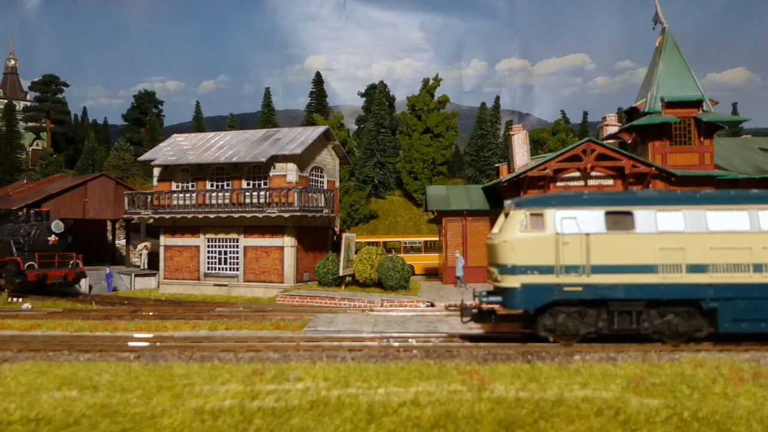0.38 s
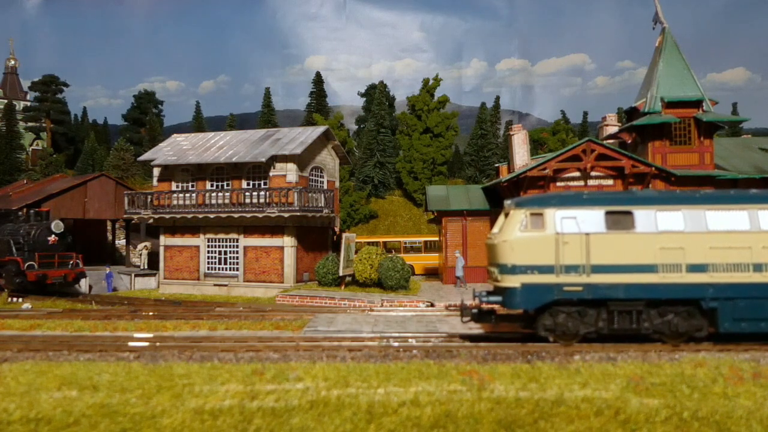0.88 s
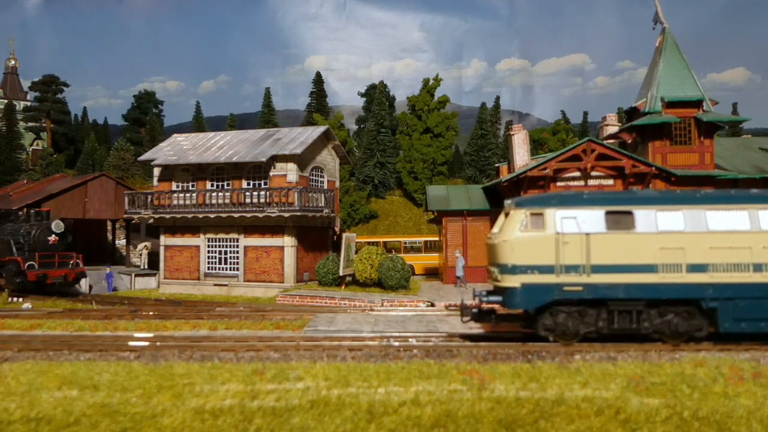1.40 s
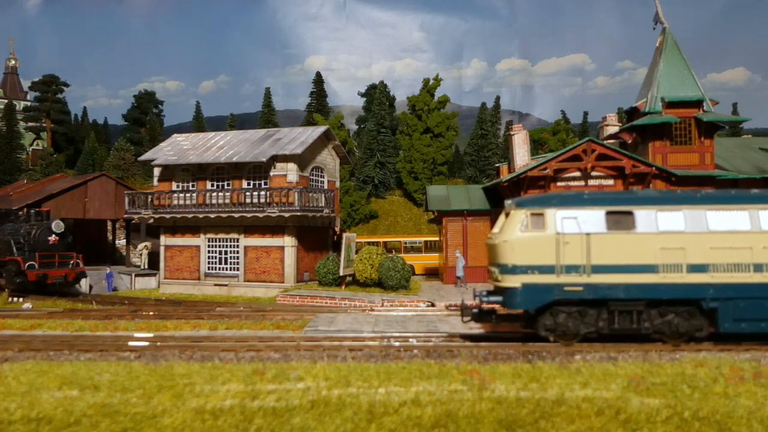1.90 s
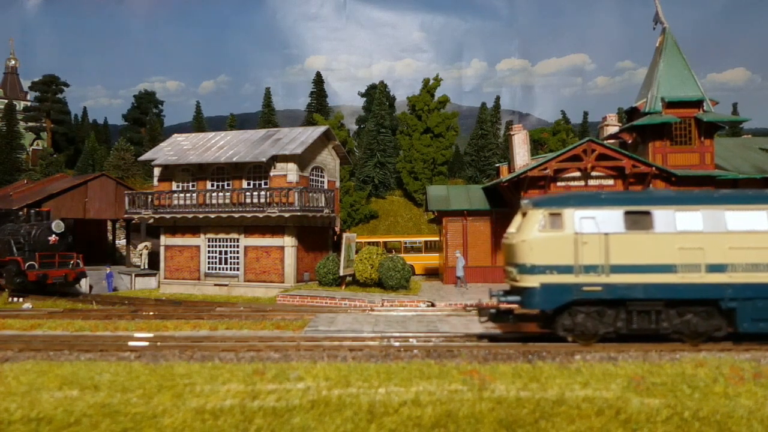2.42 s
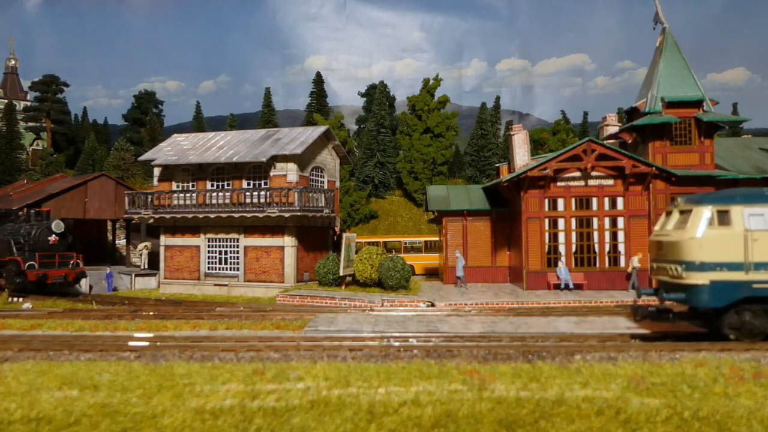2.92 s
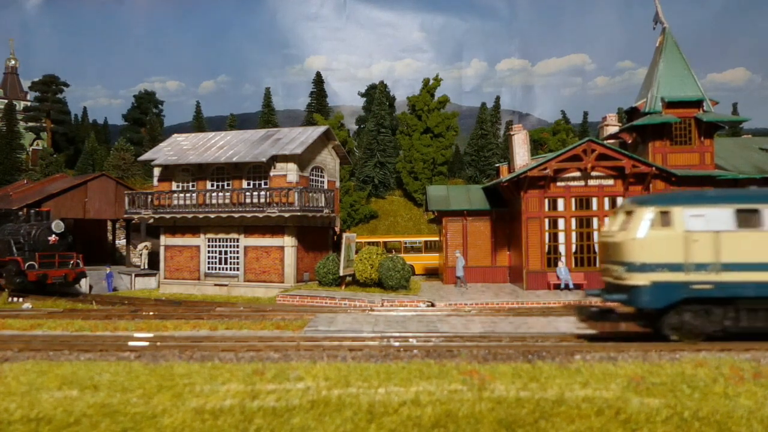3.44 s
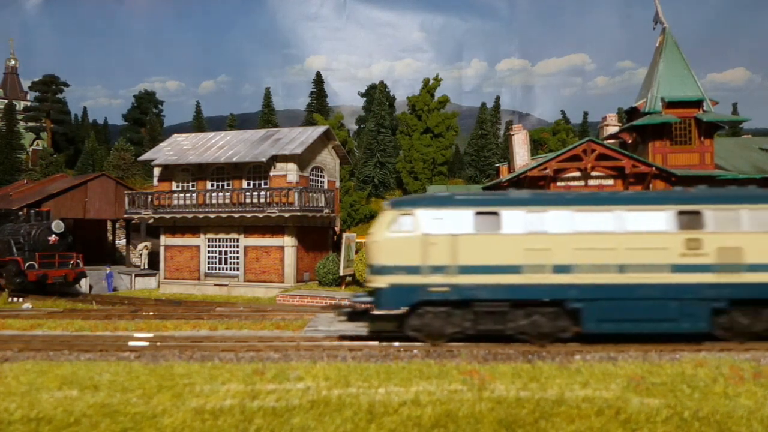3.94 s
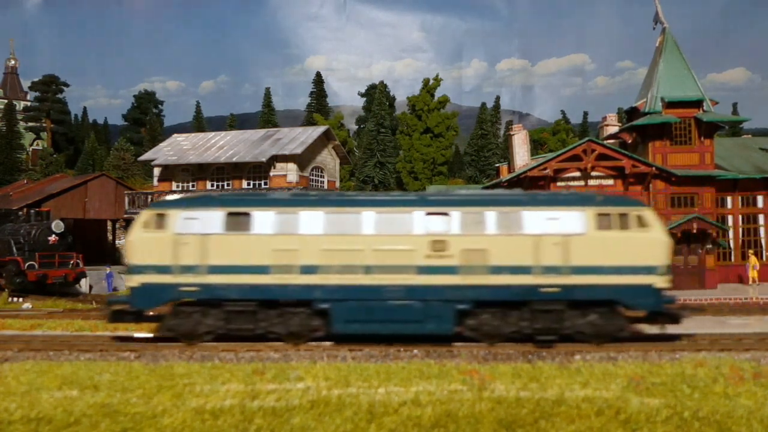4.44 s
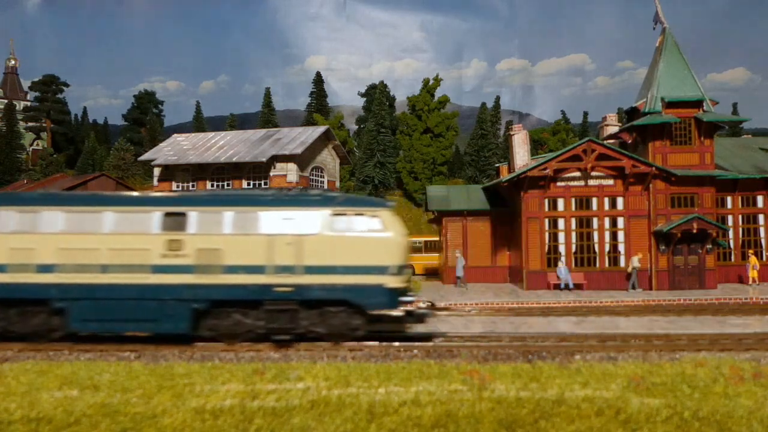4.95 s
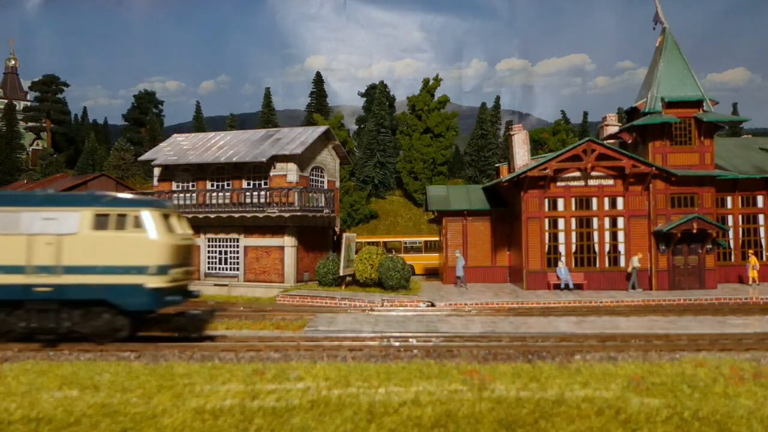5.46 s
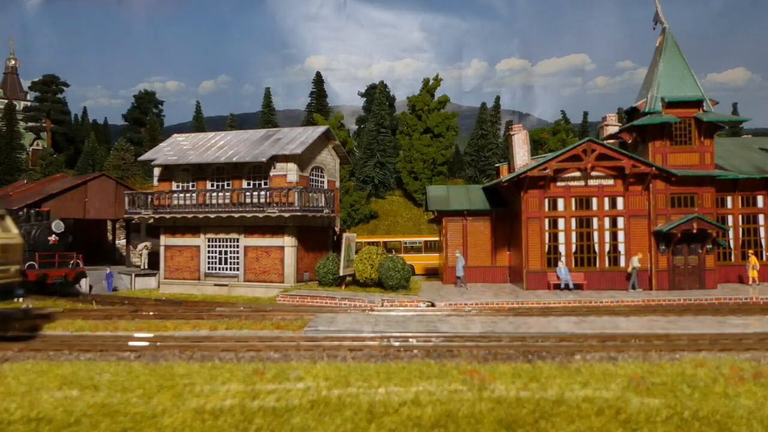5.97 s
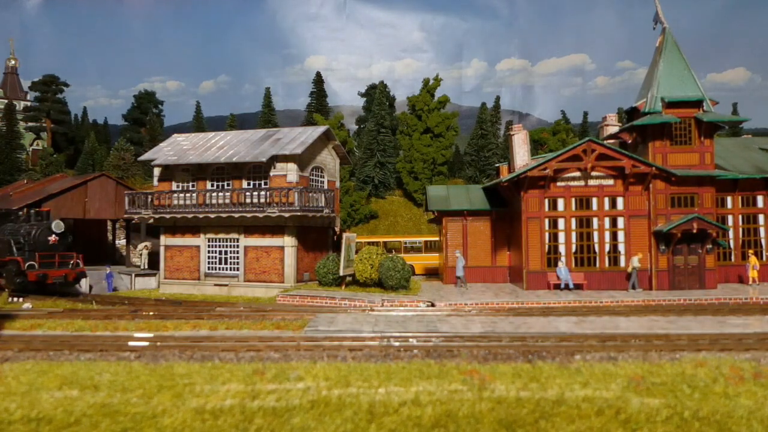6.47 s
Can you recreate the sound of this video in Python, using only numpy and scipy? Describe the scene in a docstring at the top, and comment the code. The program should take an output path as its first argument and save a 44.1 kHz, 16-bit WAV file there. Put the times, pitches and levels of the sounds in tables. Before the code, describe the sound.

A model railway on a wooden baseboard, miked close indoors. Sparse knocks rattle the wood while a distant train wavers quietly. After a click, a tiny locomotive backs off in a short grinding burst, pauses, then passes right to left, plastic shell rattling, gears hissing, wheels ticking and thumping on the board. It dies away, leaving faint drone and a last relay click.

```python
"""In a room, on a wooden baseboard, a small electric model locomotive shunts back, stops, then rolls past from
right to left of a pair of microphone ports. Noise shaped by uneven motor ticks gives gears, shell and board;
short blows on resonances give wheel ticks and thumps, knocks on the right and snaps of a reversing relay.
Wood scrapes, a broad swish passes, a hum swells near 430 Hz, and shaped noise makes another train drone
far off in the room."""
import sys
import numpy as np
from scipy import signal
from scipy.fft import rfft, irfft, next_fast_len
from scipy.io import wavfile
from scipy.ndimage import uniform_filter1d, map_coordinates

SR = 44100
rng = np.random.default_rng(int(sys.argv[2]) if len(sys.argv) > 2 else 0)


def materialize(psi):
    """Save the field psi as 16-bit PCM at rate SR to the path in sys.argv[1].

    A 1-D psi becomes a single channel; in a 2-D psi each row is a channel.
    """
    bounded = np.clip(np.atleast_2d(psi).T, -1, 1)
    quanta = np.round(bounded * 32767).astype(np.int16)
    wavfile.write(sys.argv[1], SR, quanta)


def field_ratio(decibels):
    """Amplitude ratio for a level in dB (20 dB per decade); scalars and array-likes work."""
    return 10 ** (np.asarray(decibels, dtype=float) / 20)


N = 291268
T = np.arange(N) / SR  # time of each sample [s]

# Source levels below are before the common mix gain in scene().
# Locomotive backing away, then rolling past: (time [s], wheel rolling level [dB], motor effort level [dB])
MOVES = [
    [(2.33, -55, -63), (2.44, -46, -44), (2.5, -38.5, -37.5), (2.58, -33, -36.5), (2.69, -37, -37),
     (2.77, -38, -40.5), (2.88, -49, -60.5), (2.98, -46, -47)],
    [(3.24, -54, -54), (3.38, -37, -39.5), (3.52, -34, -32), (3.7, -39, -37), (3.94, -36, -33.5),
     (4.2, -38.5, -36.5), (4.42, -38.5, -36), (4.6, -36, -34), (4.9, -35.5, -33), (5.1, -34, -33),
     (5.5, -37.5, -38), (5.63, -40.5, -38), (5.72, -36, -38), (5.87, -40, -42), (6.05, -45, -47.5),
     (6.18, -47.5, -53.5), (6.28, -60, -62), (6.44, -71, -66)],
]
# Rumble of the baseboard: (frequency [Hz], relative level per Hz [dB])
BOARD_SPECTRUM = [(35, -55), (60, -20), (145, -17), (277, -5), (351, -5.5), (594, 1.5), (661, 2),
                  (734, -1.5), (1400, -7), (1820, -3.5), (3080, -120)]
# Resonances of the locomotive shell: (frequency [Hz], width [Hz], relative level [dB])
SHELL_MODES = [(1070, 1390, -4), (1652, 464, 1.5), (1907, 263, 2), (2640, 870, -2.5)]
# Gear noise from ahead, then from the side: (frequency [Hz], relative level per Hz [dB])
GEAR_SPECTRA = [
    [(1940, -50), (3300, -3.5), (3820, -4.5), (4590, -4), (5040, -5), (5940, 0), (6520, -4), (7390, -5),
     (8270, -9), (9250, -12), (10100, -5.5), (11200, -8.5), (13800, -12), (14900, -9), (16000, -19)],
    [(1940, -32), (3300, -1.5), (4470, 0), (5450, -1), (6730, -2.5), (8000, -4.5), (9250, -4.5),
     (10800, -4), (12500, -8), (13600, -9), (14800, -12), (15300, -8), (16000, -20)],
]
# Resonances of the gearbox: (frequency [Hz], width [Hz], relative level [dB])
GEARBOX_MODES = [(2750, 130, -2), (3120, 240, 0)]
# Resonances rung by the motor ticks: (frequency [Hz], width [Hz], relative level [dB])
BRUSH_MODES = [(5400, 360, 4.5), (10540, 490, 4.5), (13950, 800, 4)]
# Hollow boom of the right end of the board: (frequency [Hz], width [Hz], relative level [dB])
HOLLOW_MODES = [(227, 190, 0)]
# Patchy wide gear hiss, separate noise at each port: (frequency [Hz], gain [dB])
WIDE_HISS_GAIN = [(3000, -45), (4200, -19), (6000, -20), (9000, -17), (11000, -15), (13000, -9),
                  (15000, -6), (16000, -30)]
# Short squeaks of the gearbox: (time [s], level [dB])
SQUEAKS = [(3.5, -36), (3.56, -37), (3.625, -32), (3.775, -33)]
# Resonances of the axle gear: (frequency [Hz], width [Hz], relative level [dB])
AXLE_MODES = [(4150, 490, -0.5), (4900, 910, 0.5), (5660, 910, 2.5), (7300, 1140, -2.5), (9400, 420, -3)]
# Wheel ticks and thumps: (time [s], tick level [dB], thump level before a 2 dB lift [dB], pitch [Hz])
WHEEL_BLOWS = [(2.4496, -19.5, -42, 2540), (2.5175, -18, -42, 1900), (2.544, -16.5, -28, 1700),
               (2.5772, -28, -30, 2500), (2.6279, -28, -29, 2800), (2.6686, -15, -46, 1800),
               (2.6977, -18.5, -49, 2200), (2.859, -26.5, -32.5, 2000), (3.5603, -14, -22.5, 3000),
               (3.6248, -10.5, -26, 2540), (3.7778, -16.5, -33, 2200), (3.8347, -18, -23, 3200),
               (4.0176, -16, -22.5, 2100), (4.0646, -12.5, -25, 2700), (4.0733, -6, -40, 2200),
               (4.0872, -15.5, -29, 2720), (4.24, -19.0, -26.5, 2500), (4.26, -17, -44, 2300),
               (4.288, -18, -20, 1830), (4.3028, -9, -31, 2550), (4.4558, -22, -29.5, 1400),
               (4.5346, -10, -28, 2520), (4.5448, -14.5, -25.5, 2380), (4.6924, -19, -23.5, 1700),
               (4.726, -16.5, -39, 1900), (4.7488, -16, -19.5, 1810), (4.8934, -28, -22, 1610),
               (4.9958, -13.5, -18.5, 2200), (5.0018, -12.5, -33, 2500), (5.1825, -17, -22, 1800),
               (5.2344, -14, -33, 3080), (5.2422, -11, -25, 3600), (5.4281, -23.0, -23.5, 1690),
               (5.488, -17, -24, 1700), (5.4957, -13, -25, 2280), (5.6016, -20.0, -29, 1400),
               (5.6826, -17, -28, 2200), (5.7139, -23.5, -22.5, 1500), (5.7316, -19, -42, 1200),
               (5.765, -12.5, -34, 1600), (5.7711, -12, -29, 2530), (5.903, -19.5, -26, 1500),
               (5.9154, -10, -29, 2100), (5.9798, -20, -35, 1700), (6.046, -25, -34, 1600),
               (6.1594, -23.5, -52, 1600), (6.1716, -24.5, -28.5, 1800)]
# Bright ticks of the axle gear: (time [s], peak level [dB])
AXLE_TICKS = [(2.431, -32), (2.4768, -27), (2.512, -26), (2.576, -23), (2.717, -18.5), (3.7514, -20.5),
              (3.972, -21), (4.2277, -25), (4.4408, -27), (4.4832, -22), (4.6493, -30), (4.7348, -17.5),
              (4.8985, -20), (5.151, -20), (5.2862, -24), (5.375, -29)]
# Plastic frame over the wheels: (frequency [Hz], width [Hz], relative level [dB])
BOGIE_MODES = [(950, 400, 0), (1400, 600, 0)]
# Resonances of a wheel: (frequency [Hz], width [Hz], relative level [dB])
WHEEL_MODES = [(1500, 730, 0.5), (2300, 1570, 6), (3220, 3400, 4), (4380, 850, 6)]
# Board under a wheel: (frequency [Hz], width [Hz], relative level [dB])
THUMP_MODES = [(456, 243, 3), (1086, 920, 2.5)]
# Knocks on the right: (time [s], blow level [dB], blow length [s], crack level over the blow [dB])
KNOCKS = [(0.045, -11, 0.00071, -13.5), (0.057, -22, 0.0018, -24), (0.609, -33, 0.004, -40),
          (0.621, -26, 0.00123, -28), (0.6405, -10, 0.00122, -21), (0.6447, -7, 0.00029, -16),
          (0.65, -19.5, 0.00153, -30), (0.662, -28, 0.0025, -30), (0.773, -29.5, 0.004, -2.5),
          (0.888, -40, 0.00408, -39), (1.9, -35.5, 0.0016, -2)]
# Knocked wood: (frequency [Hz], width [Hz], relative level [dB])
WOOD_MODES = [(662, 120, 1), (844, 370, 0.5), (1350, 580, 1.5), (2090, 750, -2), (2890, 710, -7.5)]
# Boom of the frame under the board: (frequency [Hz], width [Hz], relative level [dB])
FRAME_MODES = [(200, 170, -2), (327, 150, -0.5), (514, 130, 0.5)]
# Rattling scrapes on the wood: (time [s], level before rise and decay [dB], rise [s], 60 dB decay [s])
SCRAPES = [(0.044, -25, 0.0027, 0.078), (0.608, -29.5, 0.012, 0.1), (0.6436, -29.5, 0.0015, 0.24),
           (0.74, -28.5, 0.011, 0.15), (0.915, -46, 0.0084, 0.21)]
# Relay snaps: (time [s], level [dB])
RELAY_SNAPS = [(1.969, -14.5), (2.903, -25.5), (6.4682, -15)]
# Ringing of the relay armature: (frequency [Hz], typical relative level [dB])
ARMATURE_MODES = [(1300, -0.5), (1845, -0.5), (2690, 9.5), (3010, 9.5), (3200, 5), (4050, 4), (4870, 3),
                  (5270, 3.5), (5895, 1.5), (8000, -9.5), (10800, -31)]
# Broad swish: (frequency [Hz], relative level per Hz [dB])
SWISH_SPECTRUM = [(120, -38), (200, 0), (328, -12), (473, -1.5), (763, -9.5), (5940, -9.5), (14300, -21.5),
                  (16000, -28)]
# Swells of hum around 430 Hz, some just after wheel thumps: (start [s], end [s], level [dB])
HUMS = [(-0.2, 0.08, -47), (0.106, 0.56, -56.5), (1.284, 1.405, -51.5), (1.598, 1.85, -55.5),
        (3.784, 3.86, -42), (5.6, 5.704, -68), (5.783, 5.82, -41.5), (5.925, 5.98, -47),
        (6.084, 6.204, -62)]
# Whirr of the far train: (time [s], level before wavering [dB])
FAR_LEVEL = [(0.0, -43), (0.27, -49), (0.65, -46.5), (0.9, -52.5), (1.25, -46), (1.69, -46), (2.1, -48),
             (3.2, -47), (6.34, -49), (6.48, -44.5), (6.6, -47.5)]
# Its drone: (frequency [Hz], relative level per Hz [dB])
DRONE_SPECTRUM = [(88, -34), (150, -25), (264, -2.5), (469, -2.5), (573, -2), (1020, -8.5), (1200, -40),
                  (1560, -35), (2640, -120)]
# Its whirr: (frequency [Hz], relative level per Hz [dB])
WHIRR_SPECTRUM = [(530, -24), (900, 0.5), (1020, -3.5), (1160, 2.5), (1400, 2), (1650, -3), (1910, -1.5),
                  (2390, -5.5), (3000, -9), (4360, -10), (4750, -12), (8500, -18.5), (11000, -21),
                  (18700, -120)]
# Far wagons on a hollow stretch: (start [s], end [s], level before wavering [dB])
MURMUR = (1.26, 1.45, -43)
# Faint whine of the far motor near 1700 Hz: (start [s], end [s], level [dB])
WHINE = (-0.2, 0.3, -55)
# Low room rumble: (frequency [Hz], relative level per Hz [dB])
AIR_SPECTRUM = [(12, -44), (20, -25), (91, -12), (129, -1.5), (161, -10), (180, -0.5), (230, -0.5),
                (400, -120)]
# Room against direct sound: (frequency [Hz], gain [dB])
ROOM_GAIN = [(100, -1.5), (300, -3.5), (1000, -5.5), (3000, -7), (6000, -18), (9000, -22), (14000, -9)]
# Decay of the room: (frequency [Hz], 60 dB decay [s])
ROOM_DECAY = [(200, 0.44), (2000, 0.23), (12000, 0.083)]
# Phase between the microphone ports: (frequency [Hz], left lead [rad])
PORT_LEAD = [(100, -3), (260, -0.77), (520, 0.37), (1460, -0.4), (2800, 0.63), (4000, 0.0)]
# The same for sound from behind the ports: (frequency [Hz], left lead [rad])
BEHIND_LEAD = [(100, 3.55), (1600, 2.8), (2400, 1.63), (4400, 1.44), (9000, 1.1)]
# Reach of the left-right tilt: (frequency [Hz], share of the tilt [1])
SIDED = [(300, 0.092), (1200, 1.38), (3000, 1.28), (6000, 0.12)]
# Phase shift off to a side: (frequency [Hz], shift per dB of tilt [rad])
SIDE_PHASE = [(2000, 0.0812), (8000, 0.07), (12500, 0.17), (14200, -0.2), (15600, 1)]
# Microphone hiss: (frequency [Hz], relative level per Hz [dB])
HISS_SPECTRUM = [(2940, -52), (5000, -3), (8020, -7), (8920, -3.5), (12000, -6.5), (15000, -7), (15600, 1),
                 (16000, -22)]

BOARD_DB, SHELL_DB = [-0.5, 0.85], 0.13  # over the rolling level; board backing, then forward
GEARBOX_DB, GEARBOX_FADE = -11.5, 1.5  # over the motor; dB lost per dB of travel left, as it turns away
HOLLOW_DB, HOLLOW_FADE = -21.5, 1.77  # over rolling at centre; dB lost per dB of travel to the left
JOLT_S, JOLT_BOARD_DB = 0.027, -20  # spread of rumble around a wheel thump; level over the thump
SQUEAK_S = 0.0057  # spread of a squeak
WIDE_HISS_LOW_S, WIDE_HISS_DB_PER_S = 5.7, 6.5  # wide gear hiss weakest; its growth away from then
CROSS_S, CROSS_DB = (2.29, 5.6), (-7.5, 0.5)  # crossing times and left-right tilts at its ends
AXLE_TURNS, AXLE_DB = [34, 30], [-1.5, -9.5]  # mean turns per s, dB over motor: backing, forward
PULL_DB, PULL_S = 7, 0.66  # extra axle chatter on pulling away; how long it lasts
BOGIE_DB, FRAME_DB = -10, -22.5  # over the wheel tick; over the knock
OFF_PITCH_DB = 10  # loss of a wheel mode one octave from the blow's pitch
CONTACT_S, SOFTER = 0.00045, 0.5  # contact of wheel on rail at -10 dB; dB longer per dB weaker
HARD_S, DULL_DB = 0.0013, 31  # softer blows lose this per mode from the second, per doubled length
SOFT_RING = 0.2  # share of that loss by which a soft blow rings more narrowly
PUFF_S, PUFF_DB, PUFF_RISE, PUFF_FALL = 0.98, -37.5, 1000, 255  # swish peak, level, dB per s up and down
DRONE_DB, DRONE_FOLLOWS = -46, 0.93  # drone level before wavering; share of the whirr's changes
FADE_DB_PER_S, MURMUR_FADE = 117, 17  # how fast held sounds come and go; wagons rolling off


def unit(x):
    """Scaled to rms 1."""
    return x / np.sqrt(np.mean(x ** 2) + 1e-20)


def along(points, hz):
    """(Hz, value) points on a log axis."""
    f, v = np.transpose(points)
    return np.interp(np.log(hz + 1), np.log(f + 1), v)


def curves(rows):
    """One value per sample for each column after the time."""
    s, *columns = np.transpose(rows)
    return [np.interp(T, s, column) for column in columns]


def wobble(rate):
    """A smooth random curve, rate knots a second."""
    knots = rng.standard_normal(int(N * rate / SR) + 4)
    return map_coordinates(knots, [T * rate])


def filtered(x, response):
    """x times a complex response of frequency."""
    m = next_fast_len(x.shape[-1] + 8192)
    return irfft(rfft(x, m) * response(np.fft.rfftfreq(m, 1 / SR)), m)[..., :x.shape[-1]]


def colour(spectrum):
    """Gain of a (Hz, dB) spectrum."""
    return lambda hz: field_ratio(along(spectrum, hz))


def body(modes):
    """Causal response of (Hz, width, dB) resonances, alternating in sign."""
    def response(f):
        return sum((-1) ** k * field_ratio(db) * 1j * f * w / (c * c - f * f + 1j * f * w)
                   for k, (c, w, db) in enumerate(modes))
    return response


def steep(modes, extra=1):
    """Resonances with steeper skirts: the response times a power of its own magnitude."""
    return lambda f: body(modes)(f) * np.abs(body(modes)(f)) ** extra


def shaped_noise(response):
    """Steady white noise through a response, rms 1."""
    return unit(filtered(rng.standard_normal(N), response))


def patchy(patchy_db):
    """White noise whose gain drifts in patches of time and frequency."""
    z = signal.stft(rng.standard_normal(N), nperseg=512)[2]
    field = uniform_filter1d(uniform_filter1d(rng.standard_normal(z.shape), 6, 0), 8, 1)
    return unit(signal.istft(z * field_ratio(patchy_db * unit(field)), nperseg=512)[1][:N])


def strike(modes, seconds, sharp=0):
    """One blow of the given length ringing the resonances, peak 1; light parts radiate no bass."""
    u = np.arange(int(.06 * SR)) / (seconds * SR)
    push = rng.standard_normal(len(u)) * u * np.exp(-u)
    push[round(seconds * SR)] += sharp * np.linalg.norm(push)  # one hard contact amid the rough ones

    def radiated(f):
        return body(modes)(f) * (1j * f / (250 + 1j * f)) ** 2 / (1 + 1j * f / 9000) ** 2
    ring = filtered(push, radiated)
    return ring / np.abs(ring).max()


def add(track, s, sound):
    """Mix a sound in at time s."""
    part = track[..., round(s * SR):][..., :sound.shape[-1]]
    part += sound[..., :part.shape[-1]]


def placed(x, tilt_db, lead=PORT_LEAD):
    """Direct sound at both ports: a side tilts the middle range and shifts the treble in phase."""
    middle = filtered(x, lambda hz: along(SIDED, hz))
    turned = filtered(x, lambda hz: 1j * along(SIDE_PHASE, hz))
    pair = [x + (field_ratio(side * tilt_db / 2) - 1) * middle + side * (tilt_db + 1.7) * turned
            for side in (1, -1)]
    return filtered(np.array(pair), lambda hz: np.exp(.5j * np.outer([1, -1], along(lead, hz))))


def tilt():
    """Left-right dB of the locomotive as it crosses."""
    return np.interp(T, CROSS_S, CROSS_DB)


def moving(move):
    """1 while the locomotive moves, with short ramps."""
    return np.clip(np.minimum(T - move[0][0], move[-1][0] - T) / 0.077, 0, 1)


def pulling():
    """1 as the locomotive pulls away forward, easing to 0."""
    late = T - MOVES[1][0][0]
    return (late > 0) * np.exp(-(late / PULL_S) ** 2)


def jolts():
    """How hard the wheel thumps are shaking things at each moment."""
    thumps = np.zeros(N)
    for s, _, thump_db, _ in WHEEL_BLOWS:
        thumps[round(s * SR)] = field_ratio(2 * thump_db)
    bell = np.exp(-.5 * (np.arange(-SR // 5, SR // 5) / SR / JOLT_S) ** 2)
    return np.sqrt(np.abs(signal.fftconvolve(thumps, bell ** 2, "same")))


def hold(start, end, db, fall=FADE_DB_PER_S):
    """A level held from start to end, fading in and out at steady rates."""
    return field_ratio(db - FADE_DB_PER_S * np.maximum(start - T, 0) - fall * np.maximum(T - end, 0))


def motor_bursts():
    """The motor ticks about 192 times a second, unevenly; each tick dies away in about a millisecond."""
    beats = np.diff(np.floor(np.cumsum(192 * (1 + .12 * wobble(120)) / SR)), prepend=0)
    ticks = beats * field_ratio(3 * rng.standard_normal(N))
    return unit(signal.lfilter([1], [1, -np.exp(-1 / (0.0011 * SR))], ticks))


def wheelset_grit():
    """Loose wheelsets knock lightly at random, about 220 times a second, in drifting density."""
    hits = rng.random(N) < 220 * field_ratio(4 * wobble(14)) / SR
    return hits * field_ratio(4 * rng.exponential(size=N).clip(0, 1.8)) * rng.choice([-1, 1], N)


def gear_hiss(bursts, surge):
    """Meshing teeth hiss, first heard from ahead and then from the side, with motor ticks in the treble."""
    mesh = patchy(patchy_db=2.2) * field_ratio(0.86 * surge + 0.8 * wobble(9)) * (1 + 0.6 * bursts)
    front, flank = (unit(filtered(mesh, colour(gears))) for gears in GEAR_SPECTRA)
    come = np.clip((T - 3.9) / 0.33, 0, 1)
    ticking = unit(filtered(bursts * rng.standard_normal(N), steep(BRUSH_MODES)))
    return unit((1 - come) * front + come * flank + field_ratio(-13.5) * ticking)


def wide_gear_hiss():
    """Patchy wide gear hiss: separate noise at each port, weakest around 5.7 s."""
    growth_db = WIDE_HISS_DB_PER_S * np.minimum(abs(T - WIDE_HISS_LOW_S), 1.3)
    patches = np.array([patchy(patchy_db=5.5), patchy(patchy_db=3.0)]) * field_ratio(growth_db)
    return filtered(patches, colour(WIDE_HISS_GAIN))


def locomotive():
    """Motor ticks and a common surge shake the gears, shell and board while the wheels roll."""
    bursts, surge, grit = motor_bursts(), wobble(40), wheelset_grit()
    board = patchy(patchy_db=1.6) * field_ratio(1.3 * surge) * (1 + 0.27 * bursts)
    rumble = unit(filtered(board, colour(BOARD_SPECTRUM)))
    rumble = unit(rumble + field_ratio(-4) * unit(filtered(grit, steep(THUMP_MODES))))
    shell = patchy(patchy_db=1.8) * field_ratio(1.8 * surge) * (1 + 0.5 * bursts)
    rattle = unit(filtered(shell, steep(SHELL_MODES)))
    rattle = unit(rattle + field_ratio(-2) * unit(filtered(grit, steep(SHELL_MODES))))
    gearbox = patchy(patchy_db=2.0) * field_ratio(1.9 * surge) * (1 + 0.14 * bursts)
    rasp = unit(filtered(gearbox, steep(GEARBOX_MODES)))
    boom = field_ratio(HOLLOW_DB - HOLLOW_FADE * tilt()) * unit(filtered(rumble, steep(HOLLOW_MODES)))
    gears = gear_hiss(bursts, surge) + field_ratio(GEARBOX_DB - GEARBOX_FADE * tilt()) * rasp
    squeak = sum(field_ratio(db) * np.exp(-.5 * ((T - s) / SQUEAK_S) ** 2) for s, db in SQUEAKS)
    mono = jolts() * field_ratio(JOLT_BOARD_DB) * rumble + squeak * rasp
    motor = np.zeros(N)
    for move, board_db in zip(MOVES, BOARD_DB):
        roll_db, motor_db = curves(move)
        rolling = field_ratio(board_db) * rumble + boom + field_ratio(SHELL_DB) * rattle
        mono += moving(move) * (field_ratio(roll_db) * rolling + field_ratio(motor_db) * gears)
        motor += moving(move) * field_ratio(motor_db)
    return mono, placed(mono, tilt()) + motor * wide_gear_hiss()


def axle_gear():
    """A tight spot on the axle gear chatters once a turn, clearest in reverse and when pulling away."""
    back, ahead = (moving(move) * field_ratio(curves(move)[1]) for move in MOVES)
    level = field_ratio(AXLE_DB[0]) * back + field_ratio(AXLE_DB[1] + PULL_DB * pulling()) * ahead
    rate = np.where(T < MOVES[1][0][0], *AXLE_TURNS) * (1 + 0.045 * wobble(6.3))
    turns = np.cumsum(rate) / SR
    turns -= turns[round(2.605 * SR)]  # the tight spot comes round at this time
    beat = field_ratio(4.3 * np.cos(2 * np.pi * turns) + 0.75 * wobble(30))
    mono = level * unit(filtered(beat * rng.standard_normal(N), steep(AXLE_MODES)))
    return mono, placed(mono, tilt())


def wheel_ticks():
    """Wheel on rail, mostly about once per wheel turn: rough tick, bogie clack, board thump; axle ticks too."""
    mono = np.zeros(N)
    for s, db, thump_db, pitch_hz in WHEEL_BLOWS:
        # each blow favours the modes near its pitch
        wheel = [(hz, width, level - OFF_PITCH_DB * abs(np.log2(hz / pitch_hz)))
                 for hz, width, level in WHEEL_MODES]
        contact = CONTACT_S * field_ratio(-SOFTER * (db + 10))
        add(mono, s, field_ratio(db) * strike(wheel, contact, sharp=1.28))
        add(mono, s, field_ratio(db + BOGIE_DB) * strike(BOGIE_MODES, 0.00173, sharp=1.0))
        add(mono, s, field_ratio(thump_db + 2.0) * strike(THUMP_MODES, 0.0046))
        add(mono, s + rng.uniform(.005, .016), field_ratio(db - 13) * strike(wheel, 0.0012))  # axle rattles after
    for s, db in AXLE_TICKS:
        add(mono, s, field_ratio(db) * strike(AXLE_MODES, 0.0008, sharp=0.6))
    return mono, placed(mono, tilt())


def knocks():
    """Blows on wood ring and crack, longer blows duller; the knocked thing scrapes and rattles."""
    mono, t = np.zeros(N), np.arange(SR // 4) / SR
    for s, db, seconds, crack_db in KNOCKS:
        dull_db = DULL_DB * max(np.log2(seconds / HARD_S), 0)
        modes = [(hz, width * field_ratio(-SOFT_RING * dull_db), level - abs(k - 1) * dull_db)
                 for k, (hz, width, level) in enumerate(WOOD_MODES)]
        add(mono, s, field_ratio(db) * strike(modes, seconds, sharp=0.91))
        add(mono, s, field_ratio(db + FRAME_DB) * strike(FRAME_MODES, 0.005))
        add(mono, s, field_ratio(db + crack_db) * strike([(6400, 3200, 0)], 0.001))
    for s, db, rise, t60 in SCRAPES:
        grains = rng.standard_normal(len(t)) * (1 + 4 * (rng.random(len(t)) < 1200 / SR))
        scrape = unit(filtered(
            grains, lambda f: body(WOOD_MODES)(f) * f / (f + 900) / (1 + (f / 3500) ** 4)))
        add(mono, s, field_ratio(db - 60 * t / t60) * (1 - np.exp(-t / rise)) * scrape)
    return mono, placed(mono, -7.5)


def relay():
    """The armature snaps over, rings briefly, bounces once and chatters on."""
    mono, t = np.zeros(N), np.arange(SR // 4) / SR
    modes = [(hz, 380, level + 0.5 * k) for k, (hz, level) in enumerate(ARMATURE_MODES)]
    for s, db in RELAY_SNAPS:
        ring = np.zeros(len(t))
        for hz, level in ARMATURE_MODES:
            decay = field_ratio(level + 2 * rng.normal() - 60 * t / 0.024)
            ring += decay * np.sin(2 * np.pi * hz * t + rng.uniform(0, 2 * np.pi))
        ring = ring / np.abs(ring).max() * (1 - np.exp(-t / 0.00056))
        shaken = unit(filtered(rng.standard_normal(len(t)), steep(modes, 0.24)))
        chatter = shaken * field_ratio(-17 - 60 * t / 0.27) * (1 - np.exp(-t / 0.0029))
        add(mono, s, field_ratio(db) * (ring + chatter))
        add(mono, s, field_ratio(db - 22.0) * strike([(9300, 6400, 0)], 0.0011))
        add(mono, s + 0.021, field_ratio(db - 9) * strike(modes[:5], 0.0004, sharp=2))  # the bounce
    return mono, placed(mono, -5.0)


def swish():
    """A brief broad brush of noise, rising and falling at steady dB rates."""
    late = T - PUFF_S
    level = field_ratio(PUFF_DB + np.minimum(PUFF_RISE * late, -PUFF_FALL * late))
    mono = level * shaped_noise(colour(SWISH_SPECTRUM))
    return mono, placed(mono, -7.5)


def hum_swells():
    """Two narrow noise bands around 430 Hz swell and fade, some swells just after wheel thumps."""
    def bands(f):
        return np.abs(body([(412, 40, 0)])(f)) ** 2 + field_ratio(-8) * np.abs(body([(465, 70, 0)])(f)) ** 2
    mono = sum(hold(*row, 118) for row in HUMS) * shaped_noise(bands)
    return mono, placed(mono, -10.0)


def far_train():
    """Wavering noise bands drone and whirr from behind the ports."""
    (whirr_db,) = curves(FAR_LEVEL)
    drone_db = DRONE_DB + DRONE_FOLLOWS * (whirr_db - whirr_db.mean()) + 2.2 * wobble(18)
    drone = field_ratio(drone_db) * unit(filtered(patchy(patchy_db=1.0), colour(DRONE_SPECTRUM)))
    whirr = unit(filtered(patchy(patchy_db=1.0), colour(WHIRR_SPECTRUM)))
    whirr *= field_ratio(whirr_db + 0.81 * wobble(22.0))
    murmur = hold(*MURMUR, MURMUR_FADE)
    wagons = shaped_noise(lambda f: body([(270, 150, 0), (460, 160, -1), (640, 160, -5)])(f) ** 2)
    drone += murmur * field_ratio(1.9 * wobble(25.3)) * wagons
    # its gears sing in two bands
    song = shaped_noise(lambda f: body([(1930, 120, 0), (2250, 200, 0)])(f) ** 2)
    whirr += (field_ratio(whirr_db - 13.5) + field_ratio(-14) * murmur) * song
    whirr += hold(*WHINE, 30) * shaped_noise(lambda f: body([(1710, 90, 0)])(f) ** 2)
    return drone + whirr, placed(drone + whirr, -3.0, BEHIND_LEAD)


def room(x):
    """Decaying noise as reverberation, different at each port; each stretch of time gets a new tail."""
    out, hop = np.zeros((2, N + SR)), 16384
    padded, window = np.pad(x, (0, 2 * hop)), np.hanning(2 * hop)
    first_window = np.where(np.arange(2 * hop) < hop, 1, window)
    for start in range(0, N, hop):
        hz, t, z = signal.stft(rng.standard_normal((2, hop)), SR, nperseg=256)
        z = z * field_ratio(-60 * t / along(ROOM_DECAY, hz)[:, None])
        z = z / np.linalg.norm(z, axis=2, keepdims=True)  # decay alone sets no colour
        tail = signal.istft(z, SR, nperseg=256)[1]
        tail = tail / np.linalg.norm(tail[0])
        piece = padded[start:start + 2 * hop] * (window if start else first_window)
        add(out, start / SR + .006, signal.fftconvolve(piece[None], tail, axes=1))
    return filtered(out[:, :N], colour(ROOM_GAIN))


def room_rumble():
    """Low rumble of the room as shaped noise, slightly opposed at the two ports."""
    air = rng.standard_normal((2, N))
    return field_ratio(-59.5) * unit(filtered(air - 0.12 * air[::-1], colour(AIR_SPECTRUM)))


def microphone_hiss():
    """Treble noise of the microphone, partly shared by the ports."""
    noise = rng.standard_normal((3, N))
    return field_ratio(-59.5) * unit(filtered(noise[0] + 1.7 * noise[1:], colour(HISS_SPECTRUM)))


def scene():
    """All sources direct and through the room, over its low rumble."""
    sources = [locomotive(), axle_gear(), wheel_ticks(), knocks(), relay(), swish(), hum_swells(), far_train()]
    direct = sum(pair for _, pair in sources)
    reverberant = room(sum(mono for mono, _ in sources))
    return field_ratio(-1.26) * (direct + reverberant) + room_rumble()


def roll_off(x):
    """The treble ends steeply here."""
    return signal.sosfilt(signal.butter(12, 16470, fs=SR, output="sos"), x)


def record(dry):
    """The microphone adds its hiss, and the band ends at 15.8 kHz."""
    limited = filtered(dry + microphone_hiss(), lambda hz: hz < 15800)
    return roll_off(limited)


dry = scene()
out = record(dry)
materialize(out)
```